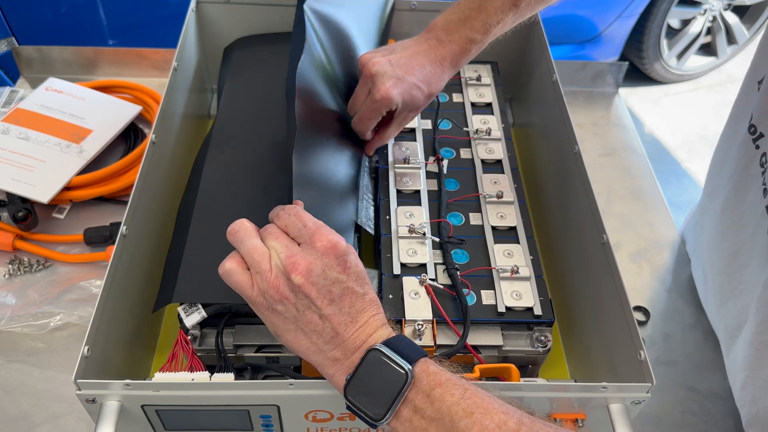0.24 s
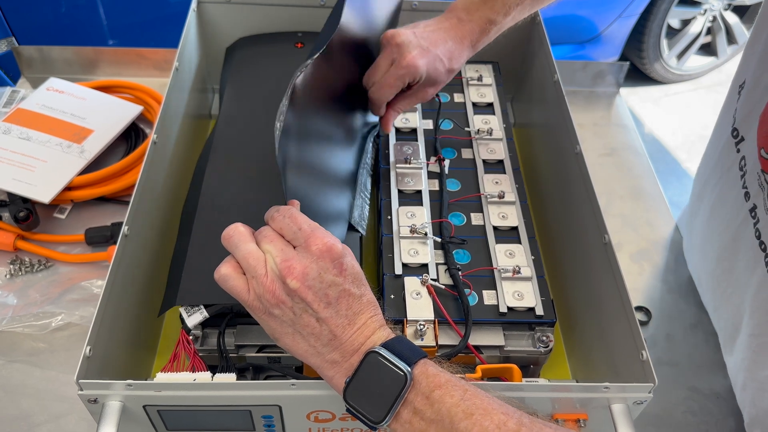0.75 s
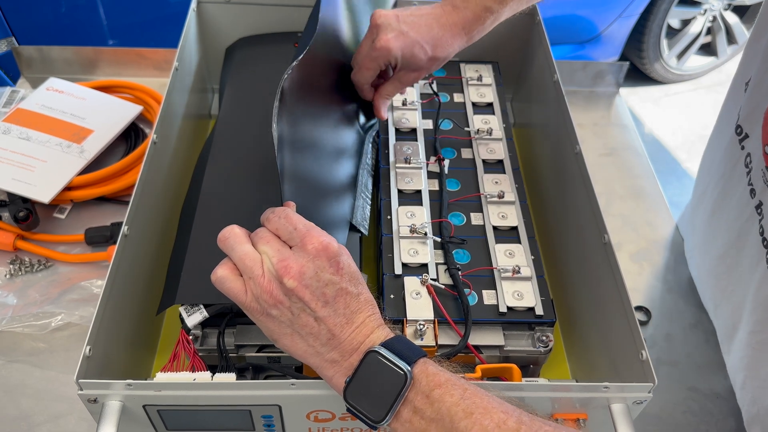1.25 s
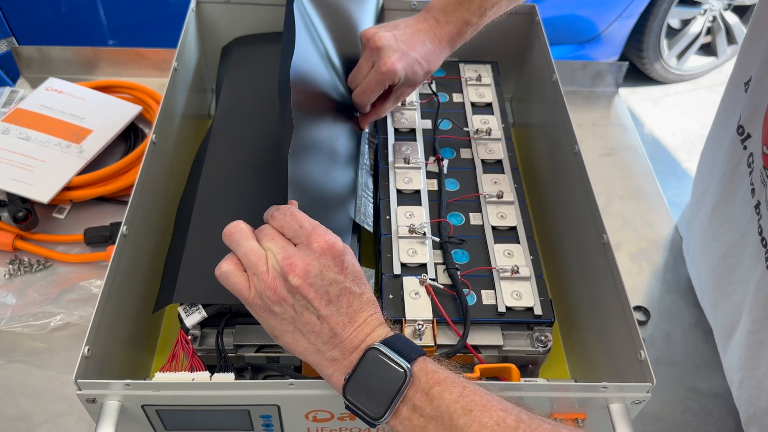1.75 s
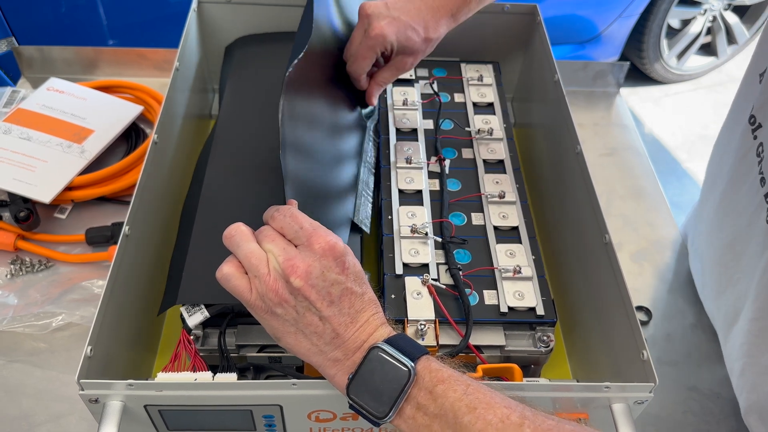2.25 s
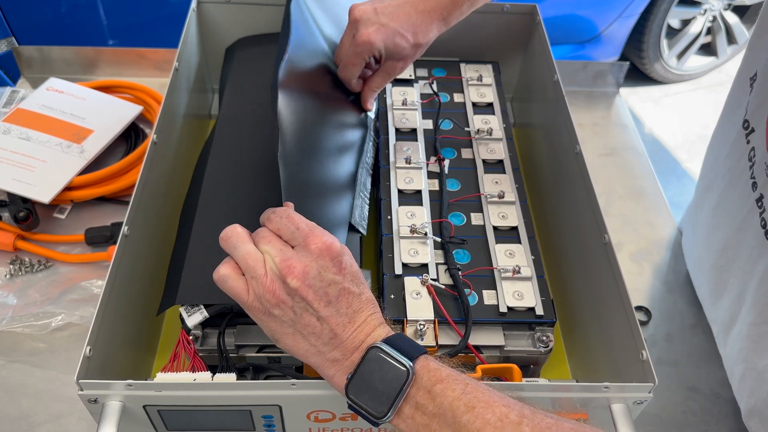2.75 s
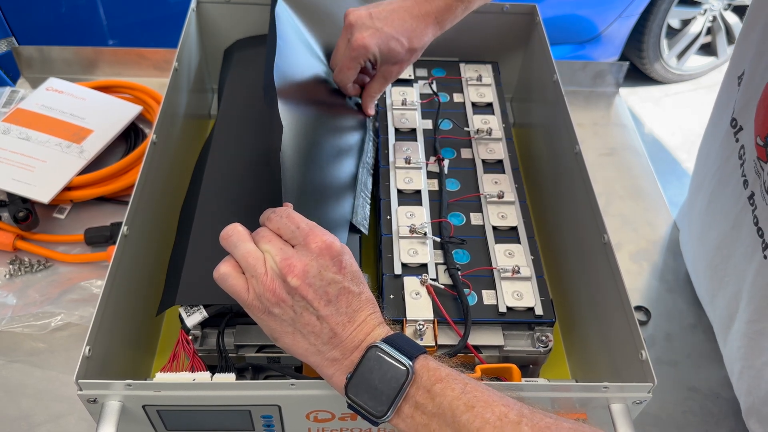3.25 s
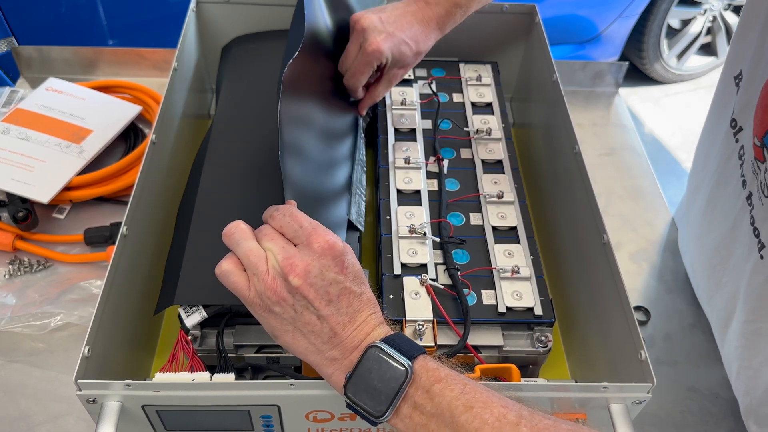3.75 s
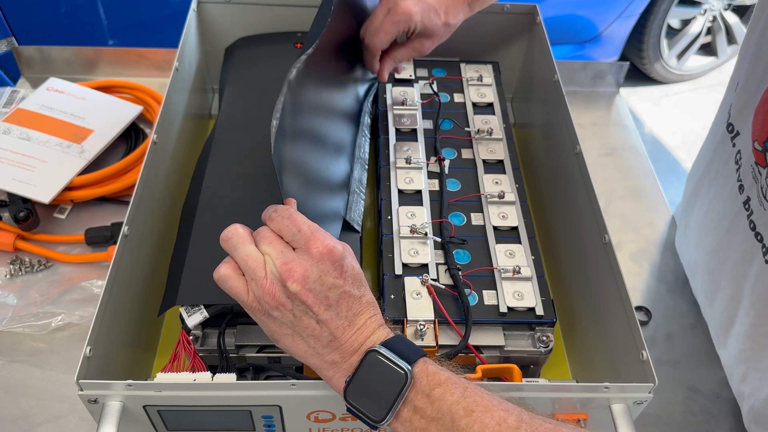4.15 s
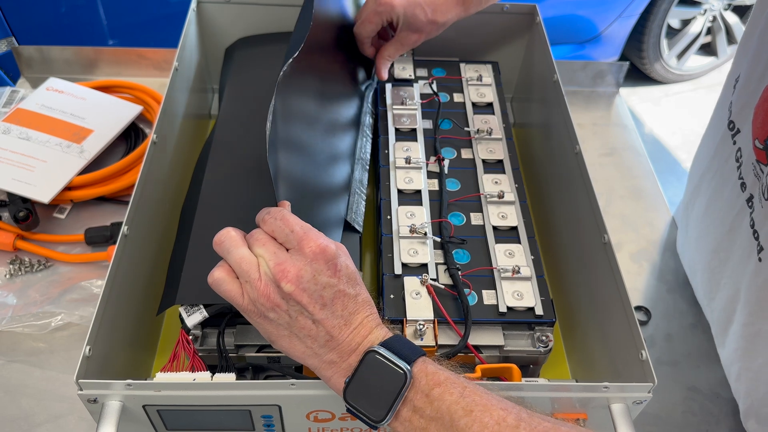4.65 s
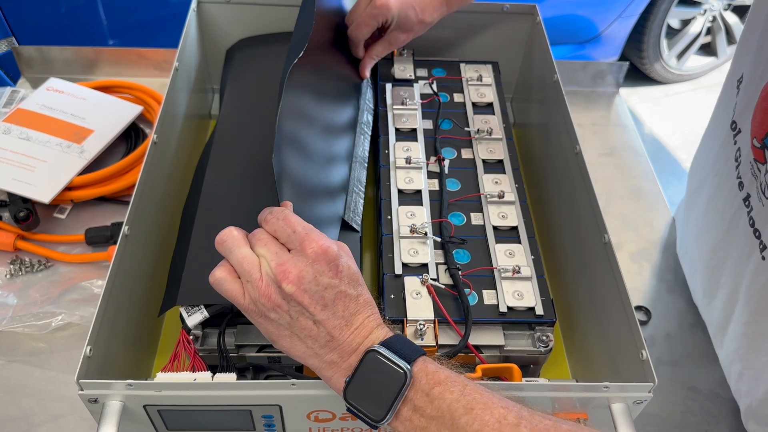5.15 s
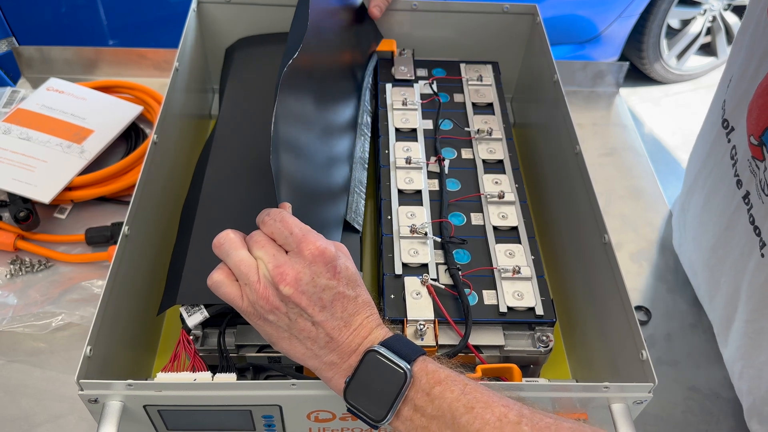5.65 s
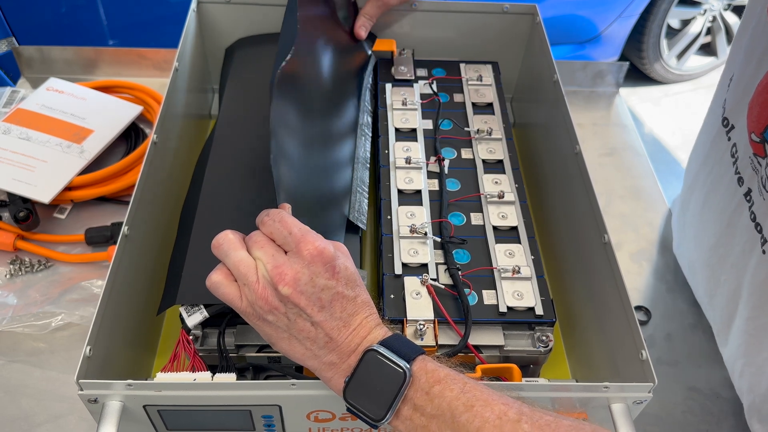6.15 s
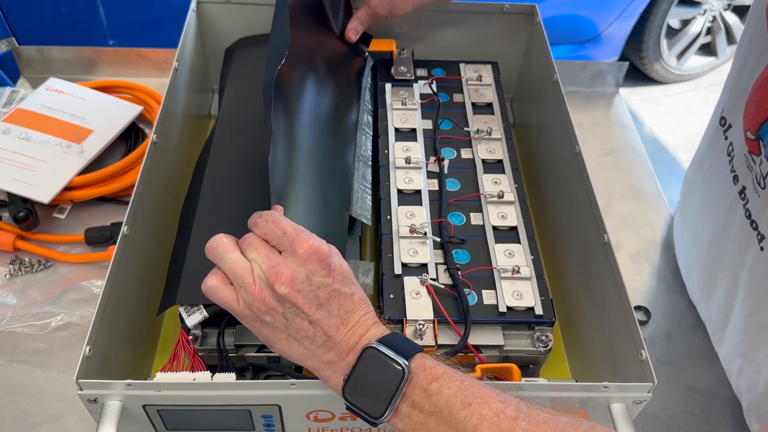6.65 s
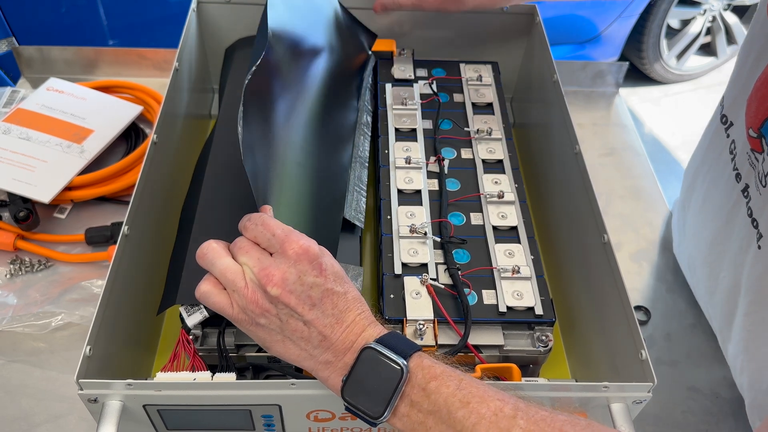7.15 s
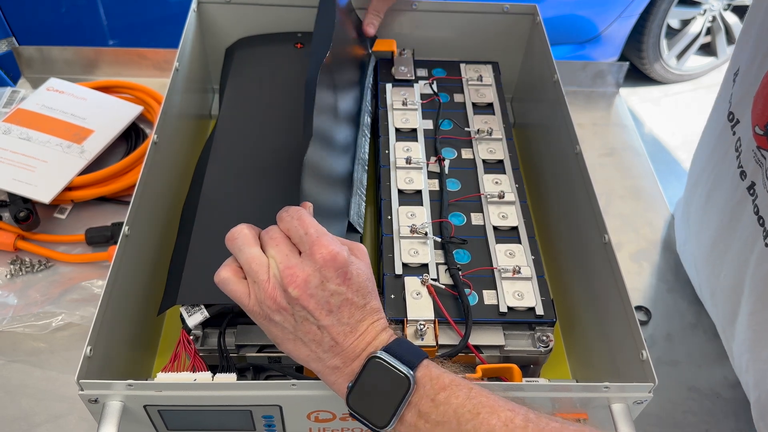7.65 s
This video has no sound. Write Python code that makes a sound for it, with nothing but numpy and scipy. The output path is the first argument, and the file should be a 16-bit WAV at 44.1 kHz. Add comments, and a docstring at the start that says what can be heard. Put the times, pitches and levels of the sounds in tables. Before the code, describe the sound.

Close up, a stiff plastic sheet is peeled by hand from glue in an open metal case. Two hollow pops open it, then crowded crackling rips and low juddering flexes, with small ticks between. The loudest tugs come just before one second and a little after four. Later the peel grows sparser, with dull buckles and soft bumps on the case. A faint steady workshop hiss remains, with short boxy reflections.

```python
"""A stiff plastic sheet is peeled off its adhesive by hand inside an open metal case, in a workshop.
It opens with two buckling snaps and the tick of a parting glue string, over a faint hiss that stays throughout.
Then come the tugs, crowded at first and sparser later: swarms of breaking glue bonds over the sheet's judder.
Snaps and plucks of single glue strings fall among them, and from about one second soft bumps ring the case.
The case walls and the room answer every sound; a last soft bump comes just before the end."""
import sys
import numpy as np
from scipy import signal
from scipy.fft import rfft, irfft, next_fast_len
from scipy.io import wavfile
from scipy.ndimage import uniform_filter1d, minimum_filter1d, map_coordinates

SR = 44100
rng = np.random.default_rng(int(sys.argv[2]) if len(sys.argv) > 2 else 0)


def transcribe(u):
    """Save the signal u as a 16-bit wav file named by the first command-line argument.

    u: samples, shape (n,) or (channels, n), limited to [-1, 1]; the rate is SR.
    q: integer samples, one column per channel.
    """
    v = np.clip(np.atleast_2d(u).T, -1, 1)
    q = np.round(v * 32767).astype(np.int16)
    wavfile.write(sys.argv[1], SR, q)


N = 347944  # samples

# tugs on the sheet, rise and fall each over 20 dB, levels before a small trim:
# peak_s, rise_s, fall_s, flex_db, glue_db
TUG_EVENTS = [(.335, 0.051, 0.034, -50.5, -38.5), (.374, .025, 0.073, -33, -26),
              (.403, 0.037, 0.12, -14.5, -31.5), (0.679, 0.082, 0.068, -34, -56.5),
              (.796, .02, 0.03, -10.5, -14), (.828, .025, 0.092, -19, -26), (.94, 0.054, 0.061, -28.5, -48),
              (1.13, 0.02, 0.013, -47, -53.5), (1.42, .024, 0.038, -35.5, -40),
              (1.565, .055, .12, -35, -39), (1.772, .045, 0.042, -33.5, -28.5),
              (1.84, .043, 0.079, -44.5, -43), (1.987, .04, 0.041, -48, -39.5),
              (2.171, 0.041, 0.083, -33, -45), (2.232, 0.033, 0.05, -19.5, -30),
              (2.319, 0.12, 0.096, -33, -57), (2.778, 0.03, 0.048, -22, -36),
              (3.49, .069, 0.14, -47.5, -43), (3.641, 0.034, 0.29, -49, -37),
              (3.70, 0.027, 0.082, -19.5, -24.5), (3.76, .043, 0.11, -25, -45),
              (3.92, 0.022, 0.098, -36.5, -61.5), (3.998, 0.032, 0.088, -24, -26),
              (4.214, 0.025, 0.027, -9, -14), (4.25, 0.053, 0.12, -21.5, -31),
              (4.57, .03, 0.11, -43, -60.5), (4.845, 0.027, 0.088, -21, -30),
              (4.958, 0.011, 0.022, -23, -24.5), (5.075, 0.038, 0.094, -17.5, -24),
              (5.338, .022, 0.084, -16.5, -30), (6.198, 0.057, 0.064, -32, -58),
              (6.986, .037, 0.07, -33, -62.5), (7.135, 0.03, .11, -24, -56.5),
              (7.235, 0.032, 0.065, -27, -53.5), (7.498, 0.028, 0.058, -58.5, -53.5)]
# the sheet buckles, thud and crack relative to the pop: start_s, pop_db, thud_db, crack_db
SNAP_EVENTS = [(0.137, -21.5, -5.5, -22.5), (.144, -16.5, -6.5, -10), (0.355, -22, -1, -27),
               (.526, -17.5, -4, -15), (0.721, -25, -17.5, -6), (.764, -23.5, -5.5, -25),
               (1.433, -25.5, -8.5, -46), (1.7737, -16.5, -42.5, -9), (2.224, -16, -10, -18),
               (2.396, -41.5, -22, -8.5), (2.685, -12.5, -3.5, -13), (2.811, -24.5, -7, -11),
               (3.372, -17, -2, -23), (3.694, -25.5, -12, -0.5), (3.729, -17, -17, -12),
               (4.097, -25.5, -19, -11), (4.499, -46.5, -6, -23), (4.992, -33, -15, -14),
               (6.947, -32.5, -23, -51), (7.059, -20, 0.5, -27.5), (7.166, -20, -6.5, -55.5),
               (7.218, -25, 0.5, -19.5)]
# a string of glue parts and plucks the lifted film: start_s, level_db, crack_db (relative to level)
PLUCK_EVENTS = [(.203, -37, -16.5), (0.294, -41.5, -14), (.633, -32, -6.5), (1.219, -50, -7),
                (1.389, -26.5, -11), (1.515, -33, -5.5), (1.632, -42, -1.5), (1.748, -34.5, -5.5),
                (1.984, -24, -8.5), (2.918, -46.5, -7.5), (3.199, -32, -5), (3.273, -35.5, -4.5),
                (3.489, -29.5, -5), (3.528, -37.5, -0.5), (3.647, -44, 6), (3.836, -36.5, 2.5),
                (4.552, -48, -4), (4.816, -36, -6), (4.949, -26, -5.5), (5.028, -29, 2.5),
                (5.248, -31.5, -13), (6.174, -32, -7), (7.03, -26, -15), (7.612, -25.5, -6.5)]
# soft bumps on the case, before a fixed trim: start_s, level_db, centre_hz, free (share of the free ring time)
BUMP_EVENTS = [(1.075, -41.5, 630, 0.59), (3.136, -48, 950, 0.23), (3.181, -39.5, 465, 0.69),
               (4.557, -42, 390, 0.77), (5.656, -30, 362, 0.73), (6.03, -47.5, 537, 1),
               (7.345, -40, 650, 0.75), (7.681, -28, 315, 0.75)]
# ringing modes of the case when free: pitch_hz, level_db (relative), t60_s
CASE_MODES = [(180, -24.5, 0.93), (248.5, -7, 0.28), (267.5, -3, 0.19), (335.3, -8, 0.19),
              (343, -15.5, 0.17), (411, -15, 0.077), (461, 9, 0.044), (565, -15.5, .24), (681.3, 8, 0.2),
              (810, -9, 0.23), (1017, -5, 0.15)]
# relative spectrum of the flexing sheet: freq_hz, level_db (per Hz)
SHEET_SPECTRUM = [(30, -57.5), (70, -42), (135, -28.5), (280, -11.5), (340, -12), (450, -5), (540, -5.5),
                  (730, 4), (950, 0), (1350, -13), (1700, -21.5), (2300, -33), (3600, -56.5), (8000, -92.5)]
# relative spectrum of the tearing glue: freq_hz, level_db (per Hz)
GLUE_SPECTRUM = [(50, -59.5), (300, -36), (900, -7), (1600, -2), (2350, 3.5), (3000, 1), (3700, -3.5),
                 (4400, -6.5), (5200, -9), (6500, -13), (7800, -23), (10000, -39), (12000, -34.5),
                 (14300, -28.5), (15800, -35.5)]
# relative spectrum of a buckling pop: freq_hz, level_db (per Hz)
POP_SPECTRUM = [(30, -55), (70, -37), (150, -15), (250, -10), (370, 7.5), (520, -0.5), (750, 12),
                (1200, 0.5), (1650, -1), (2400, 5.5), (4000, -4), (6300, -7), (8200, -26.5), (10500, -37.5)]
# the freshly lifted strip of film rings, at its fullest: centre_hz, width_hz, boost_db
FILM_PEAKS = [(839, 350, 2), (1440, 550, -23.5), (2160, 460, 12), (3773, 770, 13), (5500, 910, 10.5),
              (6360, 810, 10)]
# air resonances inside the case: centre_hz, width_hz, boost_db
CAVITY_PEAKS = [(283.3, 4.3, 9), (458, 90, 6), (680, 12, -2), (1280, 55, 1.5), (1372, 68, 3.5),
                (1893, 180, 5)]
# decay of case walls and room: freq_hz, t60_s
ROOM_DECAY = [(150, 0.59), (400, 0.34), (1000, 0.16), (2800, 0.27), (7300, 0.055), (14000, 0.15)]
# relative spectrum of the hiss: freq_hz, level_db (per Hz)
HISS_SPECTRUM = [(15, -87), (25, -49), (153, -20.5), (175, -17), (317, -11.5), (372, -1), (404, -10),
                 (558, -2), (1690, -20.5), (3600, -23), (5390, -21.5), (6520, -28), (7870, -34.5),
                 (8540, -40), (15900, -53.5)]
# drift of the hiss, before a fixed trim: time_s, level_db
HISS_LEVEL = [(0, -65.5), (1.2, -70), (2.3, -66.5), (4.4, -69), (5.6, -67), (6.7, -72), (7.3, -65)]

# glue tilt in dB per octave: grows with tearing over flexing, and as the peel moves along the strip
BRIGHT_PER_DB, BRIGHT_AT_DB, BRIGHT_PER_S = 0.61, 2, 1.1
BRIGHT_RANGE = (-20.5, 2.1)  # dB per octave
# in a gentle peel a larger patch of glue lets go now and then
STRAY_PER_S, STRAY_DB = 30, 11.5
# top treble of a snap against its crack; a louder pop has more of it
TICK_DB, TICK_PER_DB, TYPICAL_POP_DB = -20, 0.4, -21.5
# the upper middle of a snap follows its crack
BODY_DB, BODY_PER_DB = 1, 0.43
# the sheet shudders after a snap, the more the deeper its thud: a swell, then a fall over 20 dB
SHUDDER_DB, SHUDDER_PER_DB = -5, 0.26
SHUDDER_RISE_S, SHUDDER_FALL_S = 0.012, 0.055
# the treble of the shudder follows the crack
SHUDDER_TREBLE_DB, SHUDDER_TREBLE_PER_DB = 13, 0.46
# a pluck has little thud, a hollow upper middle, and a tick below its crack
PLUCK_THUD_DB, PLUCK_HOLLOW_DB, PLUCK_TICK_DB = -12, -15.5, -4.5
TOP_HZ = 15900  # upper band limit


def tugs():
    """Each tug lets the sheet judder in dull slips while glue bonds break in a finer swarm."""
    out = np.zeros(N)
    lead = 0.2  # s before the peak
    t = np.arange(3 * SR // 4) / SR - lead
    for s, rise, fall, flex_db, glue_db in TUG_EVENTS:
        excess_db = glue_db - flex_db
        bright = BRIGHT_PER_S * s + BRIGHT_PER_DB * (excess_db - BRIGHT_AT_DB)
        bright = np.clip(bright, *BRIGHT_RANGE)
        envelope = amp(-20 * np.where(t < 0, np.abs(t / rise) ** 1.92, t / fall))

        # a slow pull sticks and slips; a quick rip runs through more evenly
        slip_depth_db = 3.5 * np.clip(rise / 0.07, 0.3, 1)
        slips = amp(slip_depth_db * wobble((t + lead) * 130))

        # a gentle peel breaks fewer bonds and lets the film ring; a hard one blurs them
        gentle = np.clip((-28 - glue_db) / 14, 0, 1)
        bonds = grains(len(t), rate=2400 - 1300 * gentle, spread_db=5)
        judder = grains(len(t), rate=1400, spread_db=2.5)
        strays = gentle * amp(STRAY_DB) * grains(len(t), rate=STRAY_PER_S, spread_db=3.5)

        # pulled taut against the glue the sheet sounds thin and high; hanging slack it booms
        taut_db = 0.36 * np.clip(excess_db + 16.5, -12, 14)
        film_share = gentle * np.clip(taut_db / 4, 0, 1)
        bend = bent(depth_db=3.5)

        def flex_colour(hz):
            slack = along([(250, 0.86), (700, -0.13), (1350, -1.6), (2300, -1.2)], hz)
            return along(SHEET_SPECTRUM, hz) - taut_db * slack + film_share * peaks(FILM_PEAKS, hz)

        def glue_colour(hz):
            tilt = bright * np.log2(np.clip(hz, 1700, 6500) / 2700)
            return along(GLUE_SPECTRUM, hz) + tilt + bend(hz) + gentle * peaks(FILM_PEAKS, hz)

        flex = swell(judder * np.sqrt(slips), envelope, flex_colour)
        glue = swell(bonds * slips + strays, envelope, glue_colour)
        add(out, s - lead, amp(flex_db - 1.26) * flex + amp(glue_db - 3.5) * glue)
    return out


def snaps():
    """A buckle flips through with thud, pop and crack; a deep thud leaves more shudder in the sheet."""
    out = np.zeros(N)
    t = np.arange(SR // 4) / SR
    settle = np.minimum(t / SHUDDER_RISE_S, amp(-20 * (t - SHUDDER_RISE_S) / SHUDDER_FALL_S))
    for s, db, thud_db, crack_db in SNAP_EVENTS:
        body_db = BODY_DB + BODY_PER_DB * crack_db
        tick_db = crack_db + TICK_DB + TICK_PER_DB * (db - TYPICAL_POP_DB)
        crease = [(400, thud_db), (620, 0.00046), (1100, 0), (1500, body_db),
                  (2100, crack_db), (3100, crack_db - 3.0), (5200, tick_db)]
        snap = crack(t, crease, flutter=0.3, ring_s=0.021)

        treble_db = SHUDDER_TREBLE_DB + SHUDDER_TREBLE_PER_DB * crack_db
        judder = grains(len(t), rate=1400, spread_db=2.5)
        shudder = swell(judder, settle, lambda hz: along(SHEET_SPECTRUM, hz)
                        + along([(1000, 0), (2000, treble_db)], hz))
        shudder_db = SHUDDER_DB + SHUDDER_PER_DB * min(thud_db, 0)
        add(out, s, amp(db) * (snap + amp(shudder_db) * shudder))
    return out


def plucks():
    """Single strings of glue part and kick the film into a thin, hollow tick."""
    out = np.zeros(N)
    t = np.arange(SR // 8) / SR
    for s, db, crack_db in PLUCK_EVENTS:
        crease = [(400, PLUCK_THUD_DB), (620, 0.0094), (1000, 0.015), (1500, PLUCK_HOLLOW_DB),
                  (2100, crack_db), (3100, crack_db), (5200, crack_db + PLUCK_TICK_DB)]
        add(out, s, amp(db) * crack(t, crease, flutter=0.47, ring_s=0.039))
    return out


def crack(t, crease, flutter, ring_s):
    """One kick inside a brief flutter, coloured by a crease; scaled so the middle of the pop peaks at 1."""
    flip = 0.002  # s until the kick
    kick = flutter * rng.standard_normal(len(t)) * np.minimum(t / flip, 1) * amp(-60 * t / ring_s)
    kick[round(flip * SR)] += 1
    middle_band = [(400, -31.5), (550, 1.5), (1300, 0), (1900, -39)]
    middle = colour(kick, lambda hz: along(POP_SPECTRUM, hz) + along(middle_band, hz))
    bend = bent(depth_db=3.5)
    sound = colour(kick, lambda hz: along(POP_SPECTRUM, hz) + along(crease, hz) + bend(hz))
    return sound / peak_level(middle)


def bumps():
    """The sheet nudges the case; a soft contact favours the modes near its centre frequency."""
    out = np.zeros(N)
    t = np.arange(SR // 2) / SR
    for s, db, centre_hz, free in BUMP_EVENTS:
        ring = np.zeros(len(t))
        for hz, level_db, t60 in CASE_MODES:
            uneven_db = level_db + rng.standard_normal()
            ring += amp(uneven_db - 60 * t / (t60 * free)) * np.cos(2 * np.pi * hz * t)
        push = 5.5 * rng.standard_normal(len(t)) * amp(-60 * t / (0.14 * free))

        def contact_db(hz):
            return -7.5 * np.log2((hz + 1) / centre_hz) ** 2 + along([(950, 5.5), (1600, -31)], hz)

        bump = colour(ring + push, contact_db)
        add(out, s, amp(db + 3.5) * bump / peak_level(bump))
    return out


def cavity(x):
    """The air in the open case resonates and reshapes a few bands, mostly lifting them."""
    return colour(x, lambda hz: peaks(CAVITY_PEAKS, hz), size=8192)


def room(x, count=26):
    """Case walls and workshop scatter the sound; each slice has a new pattern as the sheet moves."""
    out = np.zeros(N)
    hop = N // count + 1
    for start in range(0, N, hop):
        hz, t, z = signal.stft(rng.standard_normal(2 * SR // 3), SR, nperseg=256)
        decay = amp(-60 * t / along(ROOM_DECAY, hz)[:, None])
        tail = signal.istft(z * decay, SR, nperseg=256)[1]
        tail = tail / np.linalg.norm(tail)
        # the scattered sound starts 3 ms late
        add(out, start / SR + 0.003, signal.fftconvolve(x[start:start + hop], tail))
    return out


def background():
    """Workshop air as coloured noise, slowly drifting in level."""
    air_db = np.interp(np.arange(N) / SR, *np.transpose(HISS_LEVEL))
    hiss = colour(rng.standard_normal(N), lambda hz: along(HISS_SPECTRUM, hz))
    return amp(air_db + 5) * unit(hiss)


def grains(length, rate, spread_db):
    """Tiny kicks at random moments, rate a second, of uneven size and random sign."""
    happens = rng.random(length) < rate / SR
    sign = rng.choice([-1, 1], length)
    return happens * sign * amp(spread_db * np.clip(rng.standard_normal(length), -2, 2))


def swell(kicks, envelope, body_db):
    """Kicks swell and fade, ring the body, and carry the energy of their envelope."""
    sound = colour(kicks * envelope, body_db)
    return unit(sound) * np.sqrt(np.mean(envelope ** 2))


def wobble(steps):
    """A smooth random curve with one knot per whole step."""
    return map_coordinates(rng.standard_normal(int(np.max(steps)) + 4), [steps])


def bent(depth_db):
    """Every bend of the sheet has its own peaks and notches, absent in the bass."""
    knots_hz = np.arange(0, SR, 220)
    ripple = depth_db * np.clip(rng.standard_normal(len(knots_hz)), -2, 1.2)
    ripple *= np.clip(knots_hz / 1800 - 0.2, 0, 1)
    return lambda hz: np.interp(hz, knots_hz, ripple)


def peaks(modes, hz):
    """The summed boost in dB of resonances given as (centre_hz, width_hz, boost_db)."""
    return sum(db / (1 + (2 * (hz - centre) / width) ** 2) for centre, width, db in modes)


def colour(x, gain_db, size=2048):
    """Ring x through a causal minimum-phase body whose gain is a function of frequency."""
    gain = amp(gain_db(np.fft.rfftfreq(size, 1 / SR)))
    cepstrum = irfft(np.log(np.maximum(gain, 1e-6)))
    # fold the cepstrum forward in time
    cepstrum[1:size // 2] *= 2
    cepstrum[size // 2 + 1:] = 0
    body = irfft(np.exp(rfft(cepstrum)))
    return signal.fftconvolve(x, body)[:len(x)]


def amp(db):
    """Decibels to gain."""
    return 10 ** (np.asarray(db) / 20)


def unit(x):
    """Scaled to rms 1."""
    return x / np.sqrt(np.mean(x ** 2) + 1e-20)


def peak_level(x, size=220):
    """The rms of the loudest few milliseconds."""
    return np.sqrt(np.max(uniform_filter1d(x ** 2, size, mode="constant")))


def along(points, hz):
    """(freq_hz, value) points read on a log frequency axis."""
    f, v = np.transpose(points)
    return np.interp(np.log(hz + 1), np.log(f + 1), v)


def add(track, s, sound):
    """Mix a sound into the track from time s on."""
    start = round(s * SR)
    sound = sound[max(-start, 0):max(N - start, 0)]
    track[max(start, 0):][:len(sound)] += sound


def scene():
    """Sheet and case close by, with the room behind them."""
    peeling = tugs()
    buckling = snaps() + plucks()
    knocking = bumps()
    echo = room(amp(-12.0) * peeling + amp(-11.0) * buckling + amp(-16) * knocking)
    in_case = cavity(peeling + buckling + echo)
    return (in_case + knocking + background())[None]


def record(dry):
    """A limiter ducks the loudest peaks, then a steep cut removes everything from TOP_HZ up."""
    ceiling = 0.8
    needed = ceiling / np.maximum(np.abs(dry), ceiling)
    # hold the lowest gain around each peak, then smooth it
    gain = uniform_filter1d(minimum_filter1d(needed, size=301), size=151)
    limited = dry * gain
    size = next_fast_len(N + SR // 2)
    in_band = np.fft.rfftfreq(size, 1 / SR) < TOP_HZ
    return irfft(rfft(limited, size) * in_band, size)[..., :N]


dry = scene()
out = record(dry)
transcribe(out)
```